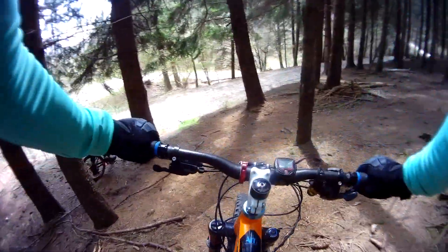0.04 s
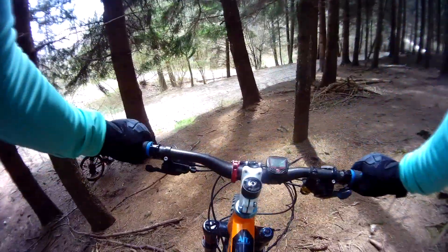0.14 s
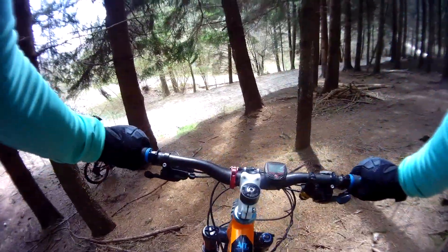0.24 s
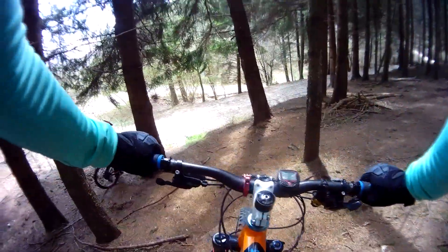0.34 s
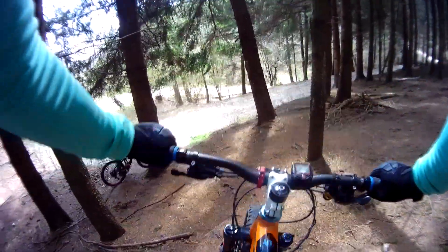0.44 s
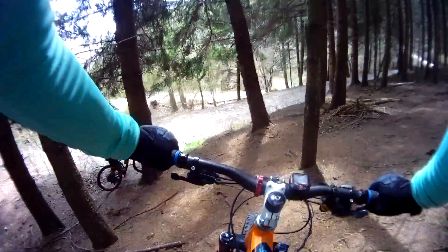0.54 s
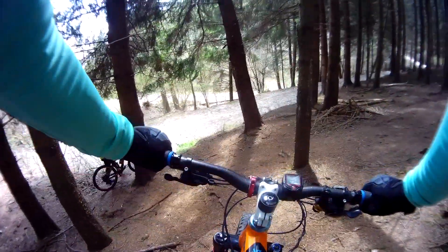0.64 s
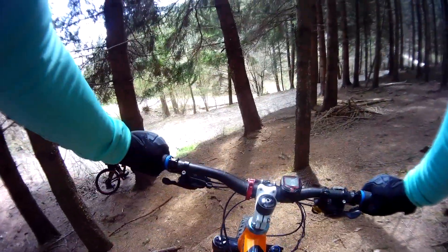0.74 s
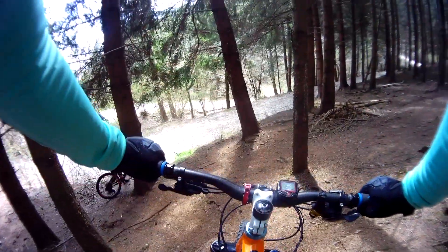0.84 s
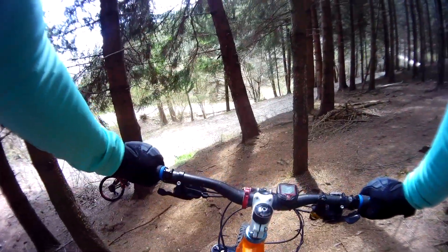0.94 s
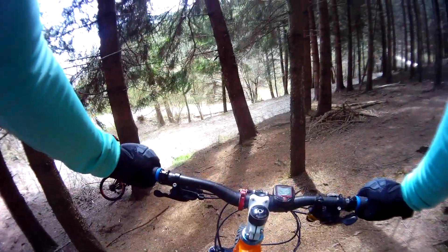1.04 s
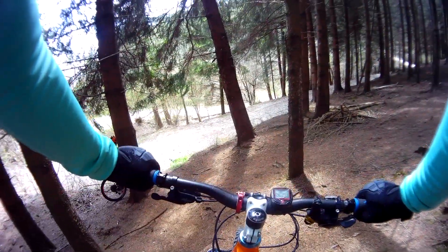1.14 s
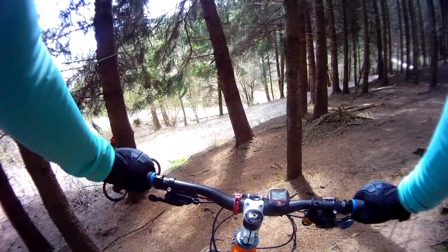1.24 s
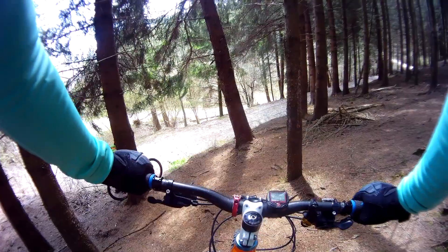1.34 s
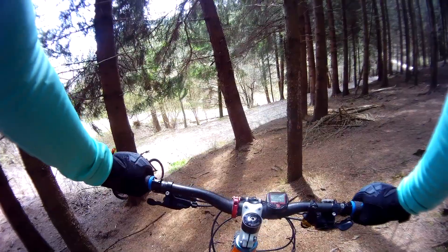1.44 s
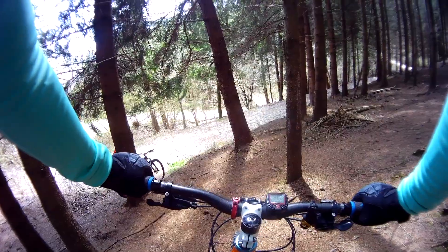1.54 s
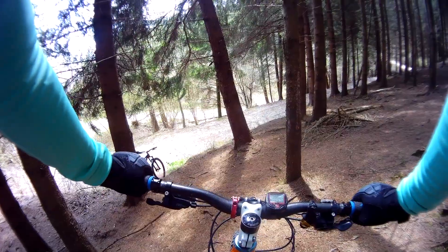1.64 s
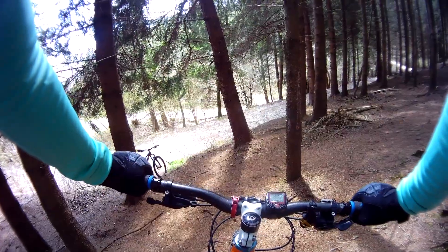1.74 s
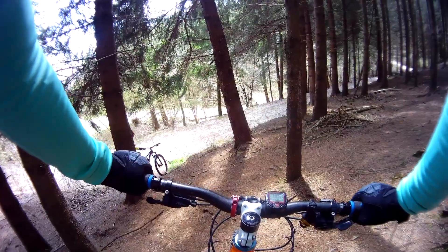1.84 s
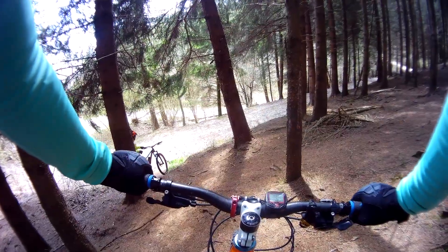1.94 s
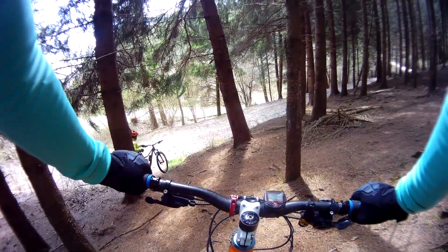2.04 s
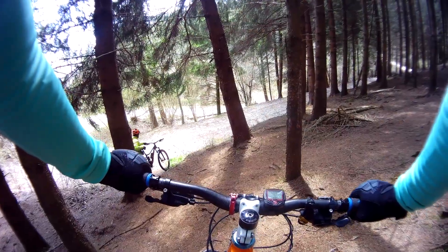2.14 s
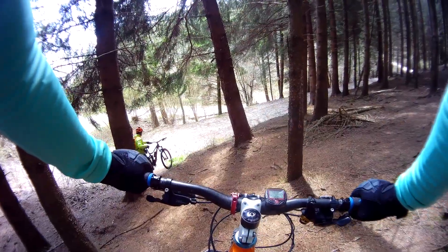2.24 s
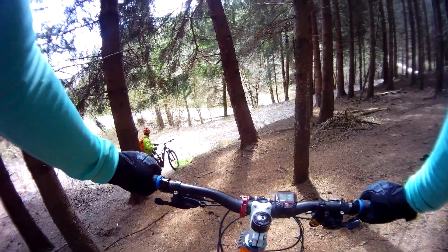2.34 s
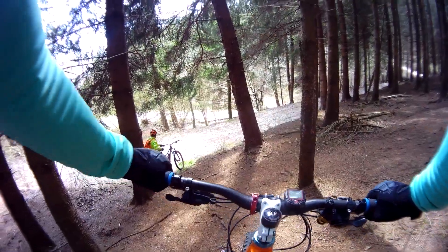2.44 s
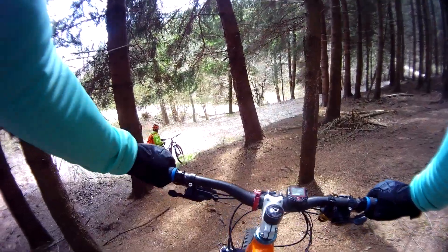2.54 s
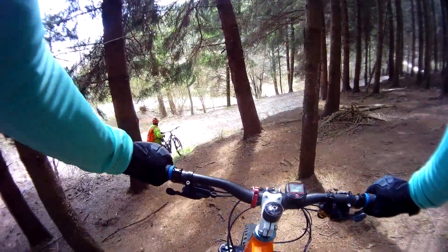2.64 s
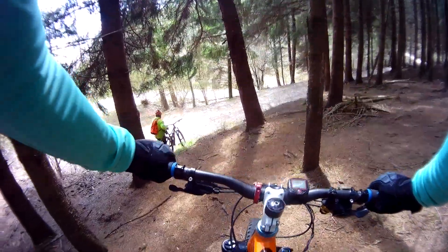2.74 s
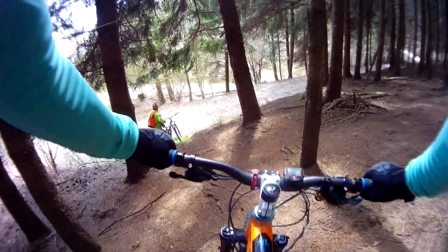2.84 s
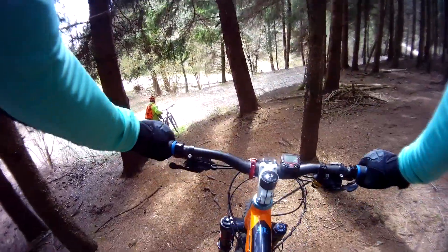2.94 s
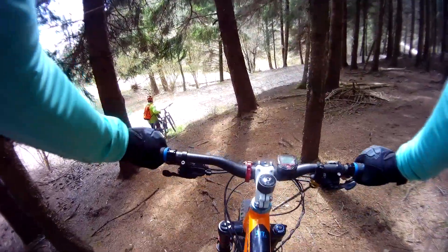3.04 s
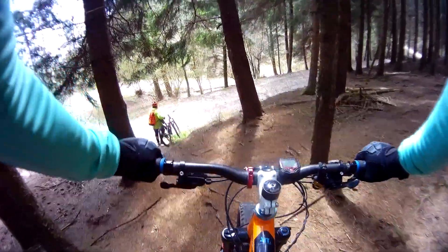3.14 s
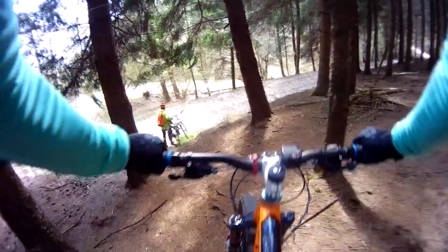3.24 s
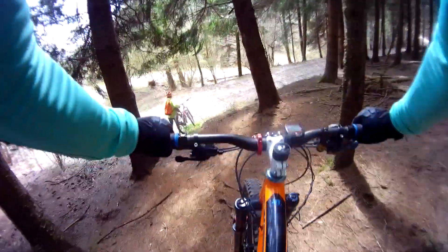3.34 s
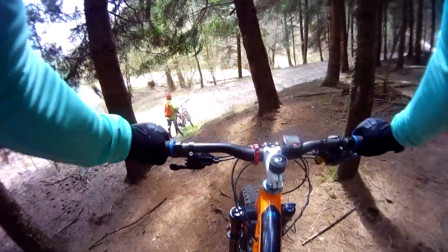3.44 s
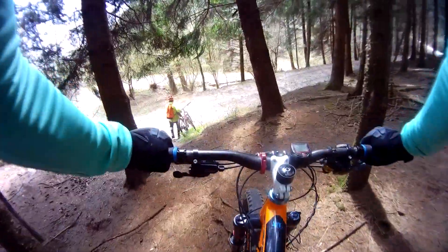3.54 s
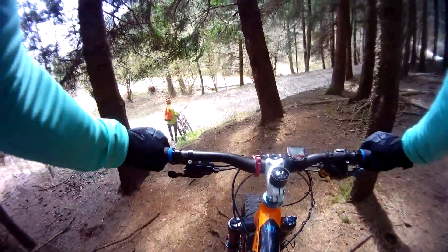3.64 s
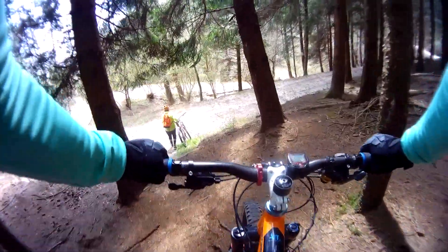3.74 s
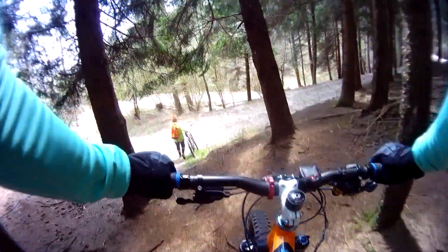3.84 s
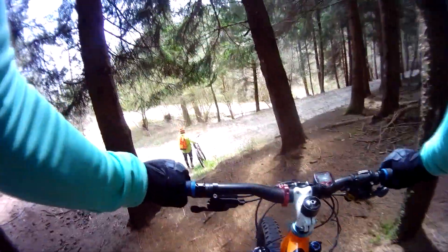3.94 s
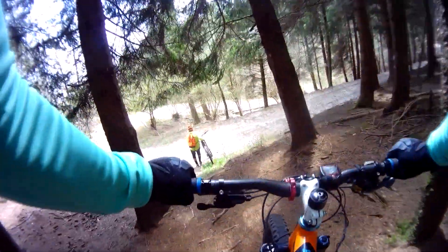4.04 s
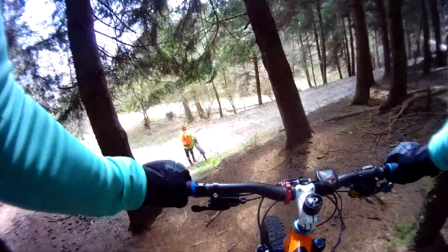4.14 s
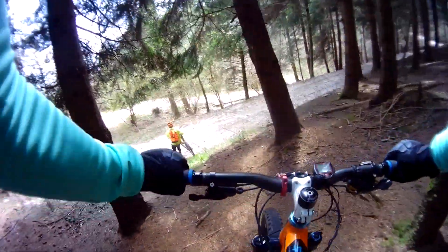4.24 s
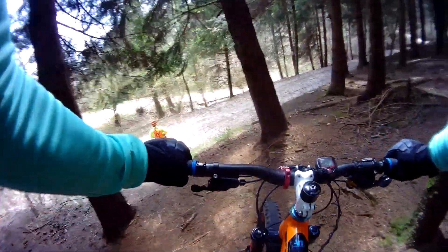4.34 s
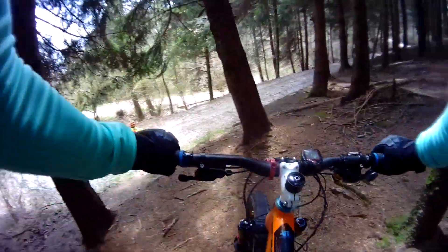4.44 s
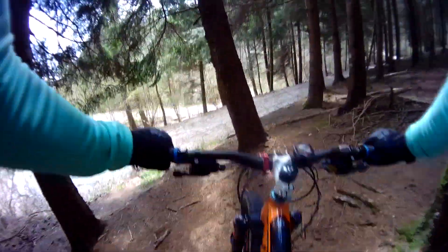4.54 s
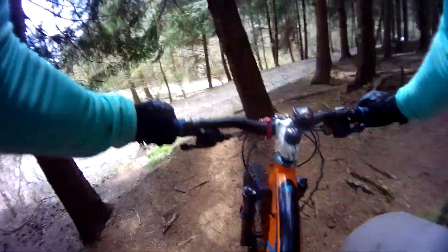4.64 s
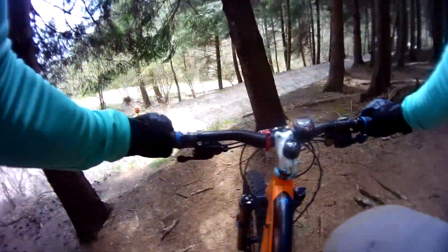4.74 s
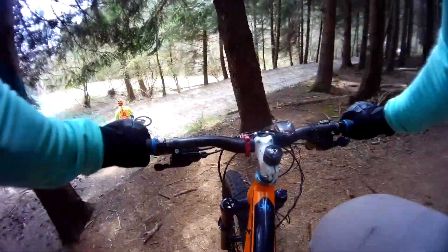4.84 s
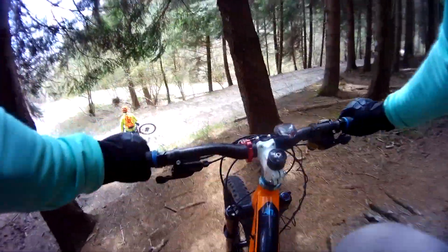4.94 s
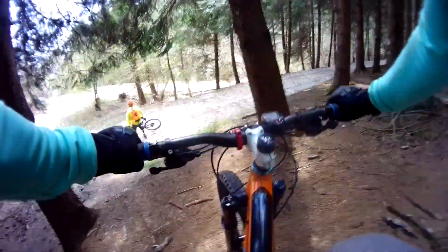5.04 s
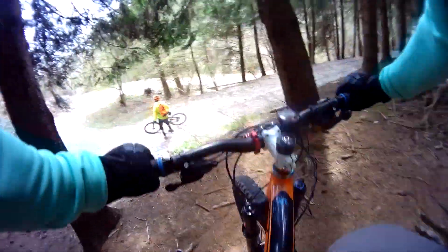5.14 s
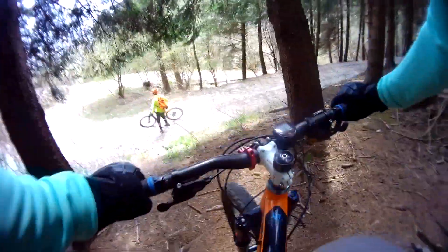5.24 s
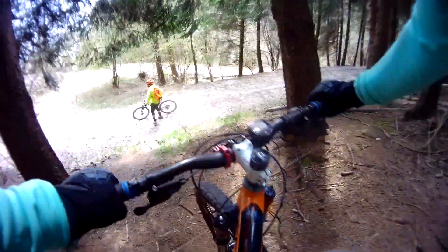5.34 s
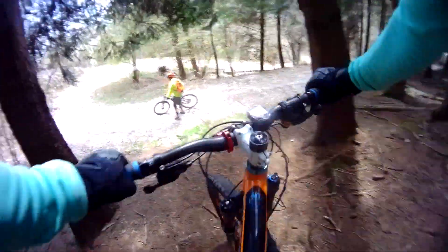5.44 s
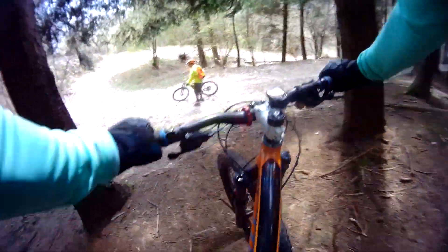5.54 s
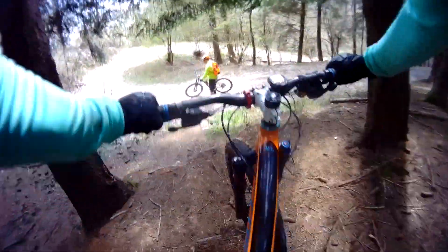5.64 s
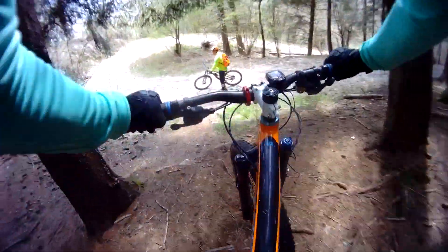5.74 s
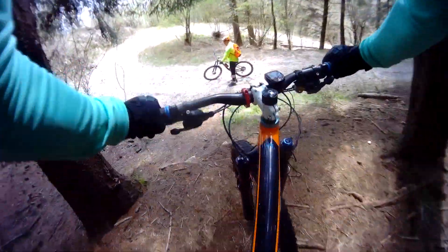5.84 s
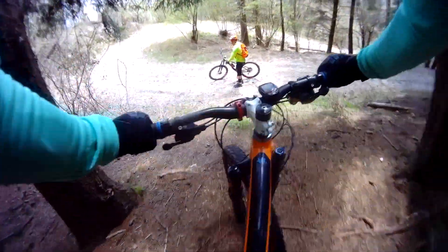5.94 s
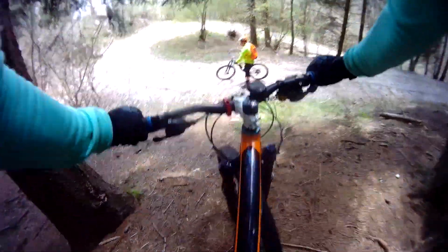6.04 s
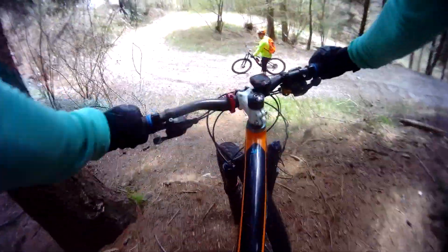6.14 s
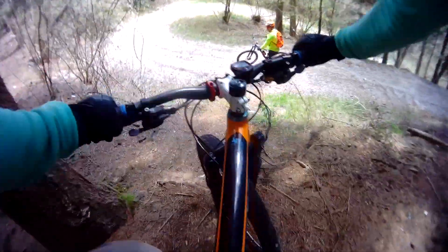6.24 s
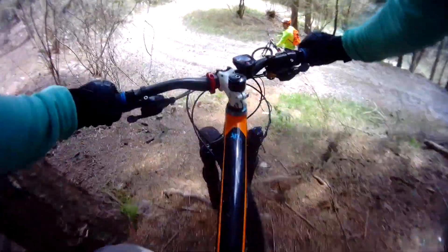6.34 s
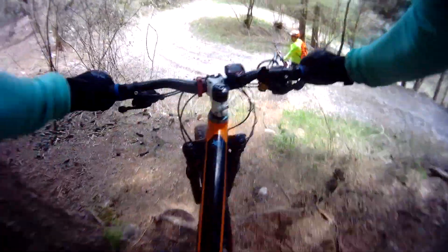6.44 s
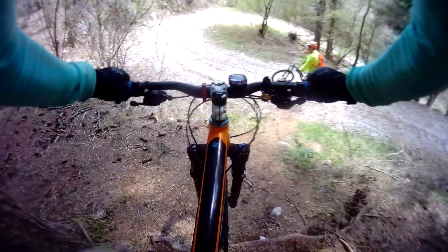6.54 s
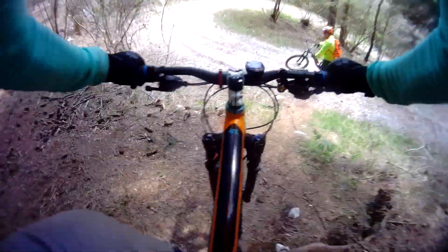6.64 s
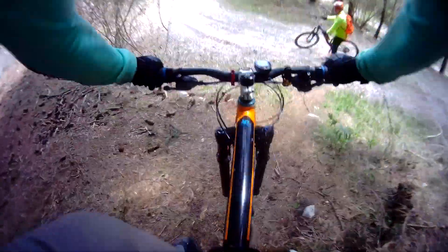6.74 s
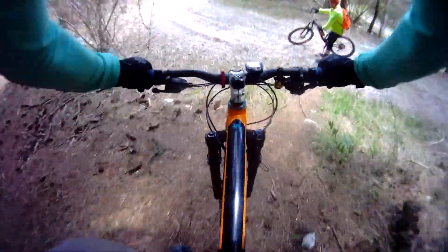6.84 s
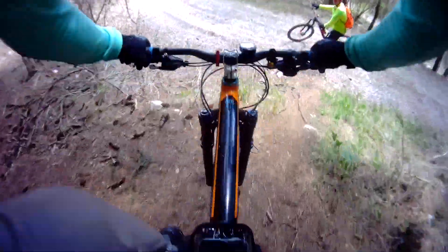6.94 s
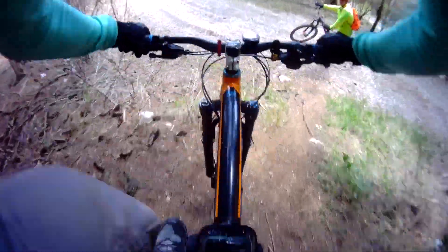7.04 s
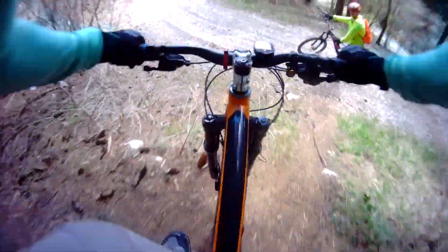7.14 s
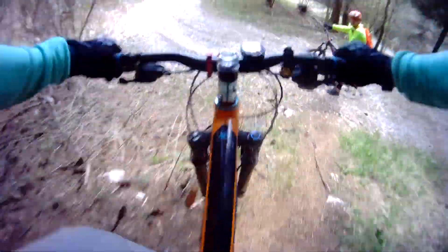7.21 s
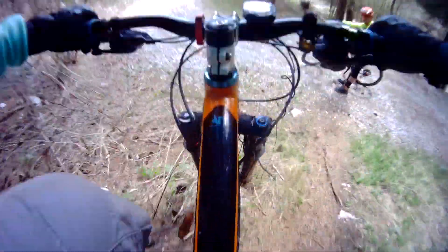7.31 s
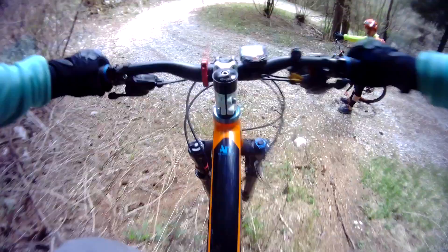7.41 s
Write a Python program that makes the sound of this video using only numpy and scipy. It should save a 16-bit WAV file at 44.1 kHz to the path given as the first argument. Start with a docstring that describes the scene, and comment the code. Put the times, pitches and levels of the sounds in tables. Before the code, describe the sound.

A mountain bike creeps over forest dirt with slow freehub ticks, nearly stops, then rolls downhill with crunching needles, snapping twigs, knocks and rubbing brakes.

```python
"""Mountain bike tyres creep to the lip of a forest slope and roll down it, heard from a cased microphone on the chest.
Shaped noise and grains make dirt roll and needle crunch; pops and grunts add grit and rubber scrubbing on roots.
Blows and noise bursts make knocks, rattles and snapping twigs; dense slips through resonances make the brake rub.
Pawl bursts and shell modes tick in the coasting freehub until the descent. Low noise buffets the case as the
ride grows, over a faint forest hiss. Sharp cracks ring the case near 15 kHz."""
import sys
import numpy as np
from scipy import signal
from scipy.fft import rfft, irfft
from scipy.io import wavfile
from scipy.ndimage import uniform_filter1d

SR = 44100
rng = np.random.default_rng(int(sys.argv[2]) if len(sys.argv) > 2 else 0)


def wav_record(signal):
    """Record a signal, one row per channel, as 16-bit PCM in the file named by sys.argv[1]."""
    frames = np.transpose(np.atleast_2d(signal))
    bounded = np.clip(frames, -1, 1)
    # unit amplitude maps onto the largest positive 16-bit level
    quanta = np.round(bounded * 32767).astype(np.int16)
    wavfile.write(sys.argv[1], SR, quanta)


N = 329471
TIME = np.arange(N) / SR

# How hard the tyres work the ground, before rough patches and trims.
# Each row: time in seconds, dirt roll in dB, needle crunch in dB.
TREAD_CURVE = [(0.0, -42, -41.5), (0.25, -47, -53), (0.8, -51.5, -57), (1.1, -60.5, -69), (1.7, -64.5, -62),
               (2.05, -72, -81), (2.41, -61, -69), (2.52, -49.5, -58), (3.1, -44, -49), (3.65, -39.5, -43),
               (4.35, -42, -46), (4.75, -38, -43.5), (5.1, -37, -45.5), (5.49, -43, -47.5), (5.7, -38, -43),
               (6.35, -39.5, -46), (7.15, -36.5, -41), (7.47, -33, -36)]
# Patches of roots and loose litter. Each row: centre in seconds, half length in seconds, extra level in dB.
ROUGH_PATCHES = [(0.435, .03, 7), (1.378, .03, 5), (3.291, .02, 3), (3.592, .025, 4), (4.62, .035, 8),
                 (4.69, .025, 5), (4.978, .04, 3), (5.078, .04, 3), (6.159, .03, 3), (6.539, .07, 4.5),
                 (7.34, .03, 7)]
# Colour of tyres on dirt. Each row: frequency in Hz, relative level in dB.
ROLL_SPECTRUM = [(71, -31.5), (120, -15), (167, -7), (292, -2.5), (412, 0.5), (678, 1), (927, -1),
                 (1290, -2.5), (1460, -6), (2050, -2.5), (2560, -14.5), (3230, -17.5), (3780, -23),
                 (4620, -29), (5000, -17), (6500, -44), (11000, -120)]
# Colour of crushed needles. Each row: frequency in Hz, relative level in dB.
CRUNCH_SPECTRUM = [(1470, -22.5), (2500, -4.5), (3060, -2.5), (3440, -12.5), (3740, -24.5), (4140, -9),
                   (5190, -6), (6150, -1.5), (6760, -7), (7770, -14.5), (9220, -4.5), (10400, -12.5),
                   (14800, 5.5), (15400, 1.5), (16000, -1.5)]
ROLL_TRIM_DB, CRUNCH_TRIM_DB, GRIT_TRIM_DB = -0.5, 0.5, 1.5
# A tyre scrubbing on a root.
# Each row: centre in seconds, pitch in Hz, pitch rise in Hz per second, half length in seconds, level in dB.
ROOT_SCRUBS = [(6.482, 613, 5001.5, 0.0079, -17), (7.373, 652, -1000, 0.022, -26.5)]

# Knocks of frame and chain, and snapping twigs. Each row: start in seconds, body level in dB, body pitch in Hz,
# rattle against the first blow in dB, crack level in dB.
KNOCK_EVENTS = [(0.0535, -34.5, 725, -3, -39), (0.2459, -45, 1414, 3, -62), (0.3918, -42.5, 1330, 3, -62),
                (0.4153, -41, 767, 20, -45), (0.4395, -40, 820, 18, -57), (1.2882, -61.5, 1160, -10, -60),
                (1.352, -53, 1300, 8, -65), (1.8419, -60, 1090, 4, -62), (2.4675, -47.5, 1680, 12, -51),
                (3.0303, -42.5, 880, 18, -61), (3.5877, -35, 1660, -3, -51), (3.7355, -42, 1690, 1, -24.5),
                (3.966, -35, 890, 8, -55), (4.1494, -38, 1370, -1, -44), (4.1568, -21.5, 1180, 1, -22.5),
                (4.2463, -28, 1220, -2, -29.5), (4.4194, -37.5, 616, 4, -43), (4.4308, -30.5, 860, 12, -34),
                (4.4407, -44, 660, -11, -28.5), (4.4654, -29.5, 656, 8, -48), (4.532, -37, 810, 9, -33.5),
                (4.5447, -33, 920, 12, -33.5), (4.6078, -19.5, 1080, -2.5, -40),
                (4.655, -24, 1530, -3, -35), (4.68, -25.5, 1550, 18, -34.5), (4.8221, -29.5, 1170, 5, -59),
                (5.0276, -26.5, 1020, 0, -38), (5.058, -29, 940, 22, -46), (5.1038, -28.5, 1540, -4, -33),
                (5.3045, -24, 1300, 5, -41), (5.4094, -30.5, 556, 25, -45), (5.6467, -34, 780, 12, -55),
                (6.0519, -36, 970, 5, -56), (6.4567, -28, 584, 2, -60), (6.503, -24.5, 1130, -9, -61),
                (6.5462, -18, 1000, 4.5, -47), (6.5565, -27.5, 1040, 4, -51), (6.5865, -29.5, 696, 15, -40),
                (6.6239, -23.5, 870, 12, -42), (6.6409, -28.5, 770, 18, -39), (7.1694, -28.5, 800, -9, -56),
                (7.2161, -29, 1070, -4, -56), (7.2663, -27.5, 990, -2, -57),
                (7.2897, -17.5, 950, -1, -33.5), (7.3219, -25, 640, -8, -53), (7.3747, -32, 740, 21, -24),
                (7.3828, -25.5, 1140, -4, -35)]
# Colour of a hollow knock. Each row: frequency in Hz, relative level in dB.
BODY_SPECTRUM = [(60, -31), (150, 3.5), (300, 2), (600, 0.5), (1300, -1), (1550, -6), (2100, -3),
                 (2500, -9), (3000, -8.5), (4000, -21.5), (6000, -12.5), (9000, -28)]
# Colour of a snap. Each row: frequency in Hz, relative level in dB.
CRACK_SPECTRUM = [(800, -7.5), (2800, -4.5), (4100, -31.5), (5000, -8.5), (6200, -7), (7500, -19),
                  (9200, -8.5), (10500, -12.5), (12500, -6), (14500, -1.5), (15400, -6.5), (16500, -9)]
# Modes of the frame, absolute in the jolt, relative in the knocks.
# Each row: frequency in Hz, level in dB, time to fall 60 dB in seconds.
FRAME_MODES = [(178, -39.5, 0.72), (335, -31, 0.39), (498.3, -26, 0.18), (266, -32, 0.13),
               (597, -30.5, 0.13), (765, -35, 0.085), (980, -40, 0.21), (1130, -35.5, 0.052),
               (1420, -43.5, 0.18), (2710, -39.5, 0.03)]
# Splinters against the first crack: level at a clean break, that break's crack level, gain per dB of weaker crack
SPLINTER_DB, CLEAN_BREAK_DB, SPLINTER_DB_PER_DB = 0.5, -32, 0.5
# Lesser random knocks: crack against body, scatter of level, typical pitch, rattle against first blow
CLATTER_CRACK_DB, CLATTER_SPREAD_DB, CLATTER_HZ, CLATTER_RATTLE_DB = -12, 2.5, 1000, 3
# Colour of the heavy jolt's thud. Each row: frequency in Hz, relative level in dB.
JOLT_SPECTRUM = [(60, -28.5), (130, -23.5), (240, 4), (350, 7), (480, 3), (700, 2), (1100, -8.5),
                 (2000, -33), (2900, -9.5), (4000, -27), (9000, -63)]
JOLT_S, JOLT_THUD_DB, JOLT_CRACK_DB = .0026, -10.5, -11

# Pulls on the brake lever. Each row: start of full grip in seconds, end of it in seconds, rub in dB before trim.
BRAKE_PULLS = [(2.99, 3.22, -51), (3.282, 3.544, -46), (4.68, 5.31, -48.5), (5.63, 6.42, -42.5),
               (6.525, 7.47, -41.5)]
# Resonances of the rubbing disc. Each row: frequency in Hz, width of one filter pass in Hz, average gain in dB.
BRAKE_RESONANCES = [(560, 67, 1.5), (1236, 270, 8.5), (1980, 300, -8.5), (4980, 240, -39),
                    (5710, 870, -9.5), (5970, 190, -5)]
GRIP_S, LET_GO_S = 0.072, .06  # the pads close and open
DRAG_DB = -24.5  # released pads graze the disc: rub before trim, against the untrimmed roll
RUB_TRIM_DB = 1.5
# A faint squeak as the pads come on. Each row: time in seconds, pitch in Hz, level in dB.
SQUEAK_CURVE = [(2.89, 4400, -90), (2.91, 4300, -73), (2.93, 4040, -67), (2.96, 3990, -62),
                (2.985, 3950, -66), (3.015, 4030, -68), (3.03, 4030, -90)]

# Speed of the coasting rear wheel. Each row: time in seconds, ratchet teeth per second.
WHEEL_SPEED = [(0.21, 7.5), (0.35, 9.86), (0.54, 9.53), (0.89, 8.06), (1.09, 11.25), (1.48, 11.26),
               (1.49, 12.99), (1.7, 11.86), (1.91, 8.1), (2.09, 12.11), (2.26, 12.39), (2.48, 17.26),
               (2.86, 13.62), (3.01, 11.07), (3.28, 14.42)]
COAST_START_S, COAST_END_S = 0.1502, 3.3  # the ticking starts and stops
# Loudness of the freehub. Each row: time in seconds, pawl chatter in dB before trim, hub shell in dB.
HUB_LOUDNESS = [(0.15, -33, -56), (0.92, -37, -60), (1.15, -43, -61), (1.42, -41.5, -63), (1.64, -46, -64),
                (1.75, -57, -71), (2.12, -56, -70), (2.48, -44.5, -54.5), (3.28, -42, -53)]
# Colour of the ratchet under the pawls. Each row: frequency in Hz, relative level in dB.
RATCHET_SPECTRUM = [(900, -15), (1500, -8), (2100, -20), (2500, -16), (3400, -22), (4200, -18),
                    (4900, -14.5), (6400, -14.5), (7700, -29), (9700, -22), (11200, -15), (12600, -4),
                    (13400, 5), (14400, -6), (16000, -18)]
# Modes of the hub shell. Each row: frequency in Hz, relative level in dB, time to fall 60 dB in seconds.
HUB_MODES = [(2373, 5, 0.055), (2550, -37, .03), (4920, -3.5, 0.048), (15450, 3, 0.043)]
CHATTER_TRIM_DB = -6.5
TICK_SPREAD_DB, TICK_DETUNE = 1.3, .02  # scatter of chatter level, and of ratchet pitch as a share

# Gusts and body shakes on the case. Each row: centre in seconds, half length in seconds, rumble in dB before trim.
CASE_GUSTS = [(0.417, .025, -53.5), (3.25, 0.029, -54), (3.622, 0.054, -49.5), (4.625, 0.034, -41),
              (5.06, .03, -54), (5.352, 0.053, -53.5), (6.202, 0.19, -41), (6.912, 0.025, -32),
              (7.007, 0.016, -31), (7.275, 0.14, -34.5)]
# Rumble before trim: at rest; added by riding at the usual roll level; dB of draught for each dB of roll
STILL_AIR_DB, DRAUGHT_DB, USUAL_ROLL_DB, DRAUGHT_DB_PER_DB = -78, -60.5, -40, 1.5
RUMBLE_TRIM_DB = 1.6
# Colour of the forest air. Each row: frequency in Hz, relative level in dB.
FOREST_SPECTRUM = [(15, -29), (25, -4), (153, -18), (223, -1.5), (285, 1), (503, -7.5), (1230, -10),
                   (1440, -12.5), (2280, -14), (2760, -14.5), (8830, -16.5), (13200, -14), (16000, -6.5)]
TOP_HZ = 16000  # upper edge of the microphone


def undb(db):
    """Turn dB into amplitude."""
    return 10 ** (np.asarray(db) / 20)


def unit(x, size=None):
    """Scale to rms 1 over the first samples (or all of them)."""
    return x / np.sqrt(np.mean(x[:size] ** 2) + 1e-18)


def fade(t, t60):
    """Decay exponentially by 60 dB in t60 seconds."""
    return np.exp(-np.log(1000) * t / max(t60, 1e-3))


def swell(centre, half):
    """Rise and die in a bell curve around a moment."""
    return np.exp(-.5 * ((TIME - centre) / half) ** 2)


def add(out, s, x):
    """Mix x into out from time s."""
    i = max(int(s * SR), 0)
    out[i:i + len(x)] += x[:N - i]


def follow(curve, when):
    """Read the columns of a timed curve at the given times."""
    s, *columns = np.transpose(curve)
    return [np.interp(when, s, column) for column in columns]


def response(points, size=2048):
    """Make a minimum-phase impulse response with the spectrum of (Hz, dB) points."""
    hz, db = np.transpose(points)
    bins = np.fft.rfftfreq(size, 1 / SR)
    gain = undb(np.interp(np.log(bins + 1), np.log(hz), db))
    # folding the cepstrum forward puts the energy at the onset
    cepstrum = irfft(np.log(gain))
    cepstrum[1:size // 2] *= 2
    cepstrum[size // 2 + 1:] = 0
    return irfft(np.exp(rfft(cepstrum)))


def through(x, ir):
    """Pass x through an impulse response."""
    return signal.fftconvolve(x, ir)[:len(x)]


def resonate(x, hz, width_hz):
    """Ring one resonance, gain 1 at its centre."""
    return signal.lfilter(*signal.iirpeak(hz, hz / width_hz, fs=SR), x)


def ringing(modes, size):
    """Sum decaying partials of (Hz, dB, t60) modes."""
    t = TIME[:size]
    return sum(undb(db) * np.sin(2 * np.pi * hz * t) * fade(t, t60) for hz, db, t60 in modes)


def walk(rate):
    """Wander through random levels held 1 / rate seconds and slewed twice; rms 1."""
    k = int(SR / rate)
    steps = np.repeat(rng.standard_normal(N // 20)[:N // k + 1], k)
    slewed = uniform_filter1d(uniform_filter1d(steps, k), k)
    return unit(slewed[:N])


def grains(per_s, spread_db):
    """Tiny fractures at random moments: many weak ones, a few strong."""
    sizes = undb(spread_db * np.minimum(rng.exponential(size=N), 5))
    fired = rng.random(N) < per_s / SR
    return unit(fired * sizes * rng.choice([-1, 1], N))


def tyres(roll_db, crunch_db):
    """Knobs thud on dirt and crush dry needles; harder rolling is lumpier and has more casing boom."""
    pace = np.interp(roll_db, [-52, -39], [.3, 1])
    bumps_db = 0.82 * pace * walk(rate=28)
    dirt = unit(grains(per_s=600, spread_db=3.0) * pace + 1.1 * rng.standard_normal(N))
    needles = unit(grains(per_s=1100, spread_db=3.0) + rng.standard_normal(N))

    roll = through(scatter(dirt, t60=.04, share_db=-6), response(ROLL_SPECTRUM))
    roll = shifting(roll, spread_db=3.2 * pace)
    crunch = through(scatter(needles, t60=.02, share_db=-6), response(CRUNCH_SPECTRUM))
    crunch = shifting(crunch, spread_db=2.2 * pace)

    # gentle rolling loses part of the boom below 300 Hz
    boom = signal.sosfiltfilt(signal.butter(2, 300, fs=SR, output="sos"), roll)
    roll = roll - (1 - pace) * boom
    roll_gain = undb(roll_db + bumps_db + ROLL_TRIM_DB)
    crunch_gain = undb(crunch_db + bumps_db + CRUNCH_TRIM_DB)
    return roll * roll_gain + crunch * crunch_gain


def scatter(x, t60, share_db):
    """The direct sound and a brief noise tail of reflections from frame, arms and ground."""
    t = TIME[:2048]
    tail = rng.standard_normal(len(t)) * fade(t, t60)
    return x + undb(share_db) * through(x, tail / np.linalg.norm(tail))


def shifting(x, spread_db):
    """The contact patch keeps changing, so each third-octave swells and sinks by itself."""
    spectrum = rfft(x)
    octaves = np.log2(np.clip(np.fft.rfftfreq(N, 1 / SR), 125, 16000) / 125)
    out = 0
    for k in range(22):
        band = np.maximum(1 - abs(3 * octaves - k), 0)
        out = out + irfft(spectrum * band, N) * undb(spread_db * walk(rate=36))
    return unit(out)


def jarring():
    """Extra dB on both tyre sounds while the wheels cross a rough patch."""
    return sum(db * swell(s, half) for s, half, db in ROUGH_PATCHES)


def grit(roll_db, count=260):
    """Small stones and cones pop from under the tread as decaying sines, each with its own pitch."""
    out, t = np.zeros(N), TIME[:1024]
    for when, pitch, size, damping in rng.random((count, 4)):
        s = when * TIME[-1]
        hz = 380 * 6.2 ** pitch
        pop = np.sin(2 * np.pi * hz * t) * fade(t, (7 + 12 * damping) / hz)
        level_db = np.interp(s, TIME, roll_db) + 10.3 * size ** 2 + GRIT_TRIM_DB
        add(out, s, pop * undb(level_db))
    return out


def scrubs():
    """Rubber sticks and slips for a few cycles: a short grunt with a rough pitch."""
    out = np.zeros(N)
    for s, hz, rise, half, db in ROOT_SCRUBS:
        glide = hz + rise * np.clip(TIME - s, -.04, .04)
        pitch = glide * (1 + 0.0696 * walk(rate=270))
        phase = 2 * np.pi * np.cumsum(pitch) / SR
        grunt = np.sin(phase) + 0.15 * np.sin(2 * phase)
        out += undb(db) * swell(s, half) * grunt
    return out


def knocks(rows):
    """A sharp blow and a dying rattle: the frame gives a hollow body, the contact a short crack."""
    out = np.zeros(N)
    body_ir, crack_ir = response(BODY_SPECTRUM), response(CRACK_SPECTRUM)
    t = TIME[:8192]
    blow, frame = 1. * (t == 0), ringing(FRAME_MODES, size=len(t))
    for s, body_db, hz, rattle_db, crack_db in rows:
        # sparse loose contacts begin a millisecond after the blow
        noise = rng.standard_normal((2, len(t)))
        contacts = rng.random((2, len(t))) < .1
        loose, splinters = noise * contacts * (t > .001)
        rattle, splinter = loose * fade(t, t60=0.074), splinters * fade(t, t60=0.045)

        body = blow + undb(rattle_db) * rattle / np.linalg.norm(rattle)
        body = through(resonate(body, hz, hz), body_ir)
        frame_ring = unit(through(body, frame), size=882)
        body = unit(body, size=882) + undb(-17.5) * frame_ring

        # a fracture dies in about a millisecond; weaker breaks splinter more
        fracture = rng.standard_normal(len(t)) * fade(t, t60=0.0011)
        splinter_db = SPLINTER_DB + SPLINTER_DB_PER_DB * (CLEAN_BREAK_DB - crack_db)
        crack = through(unit(fracture) + undb(splinter_db) * unit(splinter), crack_ir)
        # thin dry twigs, all crack and little body, are the brightest
        crack = sharpen(crack, .5 * (crack_db - body_db) - 9)
        add(out, s, body * undb(body_db) + unit(crack, size=882) * undb(crack_db))
    return out


def clatter(roll_db, count=22):
    """Rows of lesser random knocks: they come thicker and harder the harder the tyres roll."""
    travelled = np.cumsum(undb(roll_db * .8))
    shares = (np.arange(count) + rng.random(count)) / count
    times = np.interp(shares, travelled / travelled[-1], TIME)
    scatters = np.clip(rng.standard_normal((count, 3)), -1.5, 1.5)
    rows = []
    for s, (force, pitch, snap) in zip(times, scatters):
        body_db = np.interp(s, TIME, roll_db) + CLATTER_SPREAD_DB * force
        crack_db = body_db + CLATTER_CRACK_DB + 2 * CLATTER_SPREAD_DB * snap
        rows.append((s, body_db, CLATTER_HZ * 2 ** (pitch / 2), CLATTER_RATTLE_DB, crack_db))
    return rows


def sharpen(crack, ring_db):
    """An abrupt crack sets the microphone case ringing at the top of the treble."""
    ring = resonate(resonate(crack, 15000, 1900), 15000, 1900)
    return unit(crack) + undb(ring_db) * unit(ring)


def thump():
    """One heavy jolt close to the microphone: a dead thud with a crack, and the frame left ringing."""
    out, t = np.zeros(N), TIME[:2048]
    burst = rng.standard_normal(len(t)) * fade(t, t60=0.012)
    crack = sharpen(through(burst, response(CRACK_SPECTRUM)), ring_db=6.5)
    thud = unit(response(JOLT_SPECTRUM), size=220)
    # the thud starts with the opposite polarity
    add(out, JOLT_S, undb(JOLT_CRACK_DB) * unit(crack, size=220) - undb(JOLT_THUD_DB) * thud)
    add(out, JOLT_S, ringing(FRAME_MODES, size=SR))
    return out


def brake(rub_db):
    """Pads drag on the disc: dense slips ring a few resonances, each wandering in level."""
    slips = grains(per_s=5000, spread_db=4.5)
    ring = 0
    for hz, width, db in BRAKE_RESONANCES:
        wander_db = 2.5 * walk(rate=14)
        mode = resonate(resonate(slips, hz, width), hz, width)
        ring = ring + undb(db + wander_db) * mode
    return unit(ring) * undb(rub_db + RUB_TRIM_DB)


def pad_pressure(roll_db):
    """Rub in dB before trim: a light drag, or the grip, hold and release of a lever pull if louder."""
    rub = undb(roll_db + DRAG_DB)
    for start, end, db in BRAKE_PULLS:
        grip = np.interp(TIME, [start - GRIP_S, start, end, end + LET_GO_S], [0, 1, 1, 0])
        rub = np.maximum(rub, undb(db) * grip)
    return 20 * np.log10(rub)


def squeak():
    """The disc sings briefly as one sine, sinking in pitch before a slight rise."""
    start, end = SQUEAK_CURVE[0][0], SQUEAK_CURVE[-1][0]
    hz, db = follow(SQUEAK_CURVE, TIME)
    phase = 2 * np.pi * np.cumsum(hz) / SR
    return np.sin(phase) * undb(db) * (TIME > start) * (TIME < end)


def freehub():
    """At each tooth the pawls land and chatter for a few milliseconds, ringing ratchet and hub shell."""
    out = np.zeros(N)
    t = TIME[:2048]
    for s in ticks():
        chatter_db, shell_db = follow(HUB_LOUDNESS, s)
        # no two teeth drop the pawls alike
        shift = 1 + TICK_DETUNE * rng.standard_normal()
        ratchet = response([(hz * shift, db) for hz, db in RATCHET_SPECTRUM])
        bounces = rng.standard_normal(len(t)) * (rng.random(len(t)) < .25)
        chatter = bounces * np.minimum(t / .002, 1) * fade(t, t60=.03)
        chatter = unit(through(chatter, ratchet), size=441)
        add(out, s, chatter * undb(chatter_db + CHATTER_TRIM_DB + TICK_SPREAD_DB * rng.standard_normal()))

        # each tooth strikes the turning shell at another place, so its modes mix anew
        modes = []
        for hz, db, t60 in HUB_MODES:
            detune = 1 + .005 * rng.standard_normal()
            modes.append((hz * detune, db + 2 * rng.standard_normal(), t60))
        add(out, s, unit(ringing(modes, size=len(t)), size=441) * undb(shell_db))
    return out


def ticks():
    """The moments when the turning wheel has carried the ratchet on by one more tooth."""
    t = TIME[(TIME >= COAST_START_S) & (TIME < COAST_END_S)]
    teeth = np.cumsum(follow(WHEEL_SPEED, t)[0]) / SR
    return np.interp(np.arange(int(teeth[-1]) + 1), teeth, t)


def buffeting(air_db):
    """Eddies and body shake rumble on the case: low noise with an unsteady level."""
    spectrum = [(15, -25), (30, 5), (52, -5.0), (85, -7), (130, -9.0), (220, -13.5), (500, -28), (2000, -67.5)]
    rumble = through(rng.standard_normal(N), response(spectrum))
    flutter_db = 2.2 * walk(rate=18)
    return unit(rumble) * undb(air_db + flutter_db + RUMBLE_TRIM_DB)


def airflow(roll_db):
    """Rumble in dB before trim: a draught that grows steeply with the roll, and gusts that swell and die."""
    draught = undb(DRAUGHT_DB + DRAUGHT_DB_PER_DB * (roll_db - USUAL_ROLL_DB))
    gusts = sum(undb(db) * swell(s, half) for s, half, db in CASE_GUSTS)
    return 20 * np.log10(undb(STILL_AIR_DB) + np.hypot(draught, gusts))


def forest():
    """Still air among the trees: coloured noise with faint hiss, wavering slightly."""
    air = unit(through(rng.standard_normal(N), response(FOREST_SPECTRUM)))
    return air * undb(-63.0 + 0.66 * walk(rate=9))


def scene():
    """Mix ground, bike and air; the tyre roll drives crunch-free grit, clatter, pad drag and draught."""
    roll_db, crunch_db = follow(TREAD_CURVE, TIME) + jarring()
    ground = tyres(roll_db, crunch_db) + grit(roll_db) + scrubs()
    impacts = knocks(KNOCK_EVENTS + clatter(roll_db)) + thump()
    bike = impacts + brake(pad_pressure(roll_db)) + squeak() + freehub()
    air = buffeting(airflow(roll_db)) + forest()
    return (ground + bike + air)[None]


def record(dry):
    """The microphone thins the deepest rumble, clips the hardest jolts and cuts the top."""
    thinned = signal.sosfilt(signal.butter(2, 42, "high", fs=SR, output="sos"), dry)
    clipped = np.clip(thinned, -.72, .72)
    return signal.sosfiltfilt(signal.ellip(8, .1, 50, TOP_HZ, fs=SR, output="sos"), clipped)


dry = scene()
out = record(dry)
wav_record(out)
```